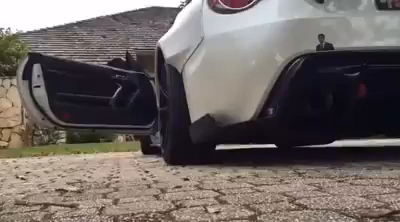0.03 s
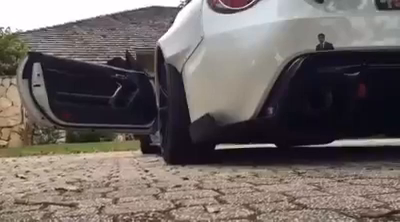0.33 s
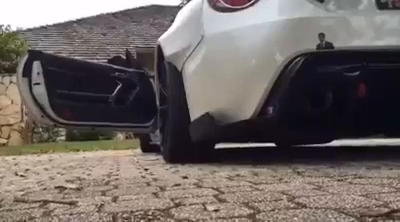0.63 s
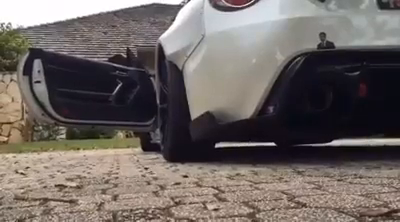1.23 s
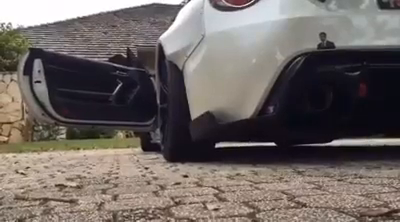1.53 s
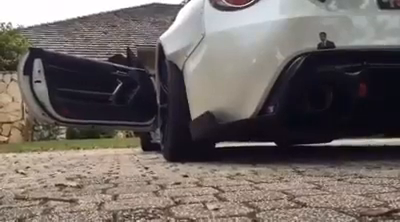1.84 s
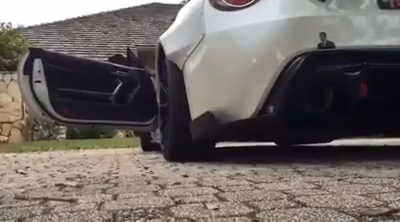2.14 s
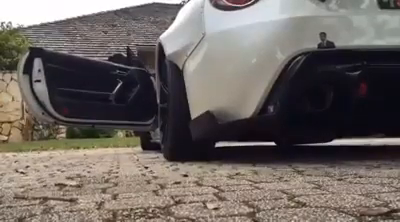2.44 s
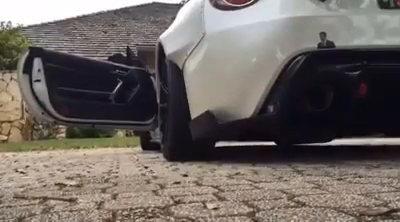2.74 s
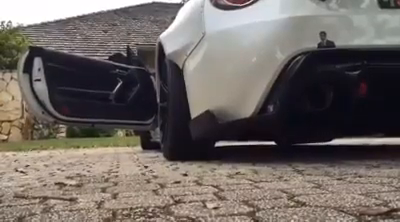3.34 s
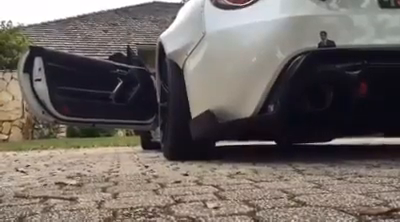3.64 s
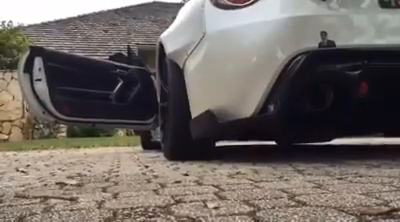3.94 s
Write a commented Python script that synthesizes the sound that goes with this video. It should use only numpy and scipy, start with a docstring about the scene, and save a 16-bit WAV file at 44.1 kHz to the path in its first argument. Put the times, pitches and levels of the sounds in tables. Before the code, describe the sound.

Heard from low behind the tailpipe, a sports car starts up: the starter hisses, the exhaust thumps hard and the revs briefly rise. It then drops to a deep, throbbing idle with a few light knocks and a short outdoor echo.

```python
"""A four-cylinder sports car starts, heard low behind its open exhaust. First the starter hisses and the
first firings bark out one by one, while gas rumbles from the pipe. Then the engine catches: gas rushes
out with each firing, and valves and the fuel pump tick in the engine bay. The revs flare and sink.
At last the engine settles into a lumpy idle in which two cylinder banks take turns, with a few light
knocks. The walls of the yard give everything a short echo."""
import sys
import numpy as np
from scipy import signal
from scipy.fft import rfft, irfft
from scipy.io import wavfile

SR = 44100
rng = np.random.default_rng(int(sys.argv[2]) if len(sys.argv) > 2 else 0)


def to_wav(s):
    """Save 16-bit WAV."""
    ch = np.atleast_2d(s).T  # columns
    pcm = np.round(np.clip(ch, -1, 1) * 32767)  # PCM
    wavfile.write(sys.argv[1], SR, pcm.astype(np.int16))


N = 176400
T = np.arange(N) / SR

# The first hard firings: start_s, thump_db, crack_db, boom_db, bark_db
FIRST_FIRINGS = [(.150, -8.5, -33, -28, -32.5), (.172, -2.5, -17.5, -3, -27.5),
                 (0.207, -10, -9.5, -2.5, -28), (.238, -0.5, -26, -6, -32), (.267, -1.5, -12, -11.5, -22.5),
                 (0.293, -5.5, -37, -28, -21.5), (0.322, -10, -14, -32, -34),
                 (.345, -17.5, -25.5, -22.5, -16.5), (.365, -6.5, -22, -28.5, -7),
                 (0.39, -13, -14, -30, -5.5), (.412, -4.5, -15, -18.5, -5.5),
                 (.433, -11, -24.5, -30.5, -20), (.454, -2, -13, -19.5, -23.5), (0.475, -4, -3, -14.5, -24),
                 (.495, -2.5, -14, -12, -16), (.515, -4.5, -8.5, -20, -21.5),
                 (.535, -14.5, -33.5, -34, -17.5), (0.611, -22, -24.5, -25, -30),
                 (0.667, -8.5, -30.5, -37, -20)]
# Tone of the crack at the mouth of the pipe: pitch_hz, gain_db
CRACK_COLOUR = [(100, -18.5), (300, 0.5), (410, 0.5), (480, -9), (600, 4.5), (760, 0), (1000, -5),
                (1600, -17.5), (2200, -31.5), (3200, -48.5), (8000, -47), (15000, -59)]
FIRST_FIRING_S = FIRST_FIRINGS[0][0]


def amp(db):
    """Turn decibels into a gain."""
    return 10 ** (np.asarray(db) / 20)


def unit(x):
    """Scale to an average (rms) level of 1."""
    return x / np.sqrt(np.mean(x ** 2) + 1e-20)


def peak(x):
    """Scale so that the highest peak is 1."""
    return x / np.abs(x).max()


def curve(rows, t=T):
    """Join (time_s, value) points with straight lines and read them at the times t."""
    return np.interp(t, *np.transpose(rows))


def gains(colour, size):
    """Turn a colour, a list of (pitch_hz, gain_db) points, into a gain for each FFT frequency."""
    hz, db = np.transpose(colour)
    return amp(np.interp(np.log(np.fft.rfftfreq(size, 1 / SR) + 1), np.log(hz + 1), db))


def noise(colour):
    """Steady noise with the given colour, at an average level of 1."""
    return unit(irfft(rfft(rng.standard_normal(N)) * gains(colour, N), N))


def pulse(colour, size=16384):
    """One pulse with the given colour that starts at once and dies away (minimum phase)."""
    cepstrum = irfft(np.log(gains(colour, size)))
    cepstrum[1:size // 2] *= 2
    cepstrum[size // 2 + 1:] = 0
    return irfft(np.exp(rfft(cepstrum)))


def ring(hz, fade_s):
    """A ringing tone that falls by 60 dB in fade_s."""
    t = T[:SR // 3]
    return np.sin(2 * np.pi * hz * t) * amp(-60 * t / fade_s)


def play(times, sizes, sound):
    """Play a copy of the sound at each time, each with its own size."""
    hits = np.bincount(np.clip(np.round(times * SR).astype(int), 0, N), sizes, N + 1)[:N]
    return signal.fftconvolve(hits, sound)[:N]


def beats(per_firing=1, lead=0, catch_s=.536):
    """Times of something driven by the crankshaft once the engine catches, lead firings early."""
    # Engine speed: time_s, firings_per_s
    speed = [(0.536, 48.53), (0.6, 54.17), (0.7, 49.19), (0.8, 49.23), (0.95, 46.63), (1.15, 44.21),
             (1.35, 41.34), (1.6, 38.94), (1.9, 38.6), (2.25, 39.56), (2.6, 39.43), (2.95, 39.6),
             (3.2, 39.92), (3.6, 39.73), (4, 39.97)]
    count = np.cumsum(curve(speed) * (T >= catch_s)) / SR
    events = np.arange(1, int((count[-1] + lead) * per_firing) + 1)
    return np.interp(events / per_firing - lead, count, T)


def jitter(times, spread_s):
    """Make each time a little early or late at random."""
    return times + rng.normal(0, spread_s, len(times))


def scatter(times, spread_db):
    """A random gain for each time."""
    return amp(spread_db * rng.standard_normal(len(times)))


def through_pipe(x, turn_hz=270):
    """The pipe delays the bass against the treble, which rounds each pulse."""
    k = np.tan(np.pi * turn_hz / SR)
    a = (k - 1) / (k + 1)
    return signal.lfilter([a, 1], [1, a], x)


def starter(whine_hz=5850, fall_hz_per_s=5900, whine_at_s=.695, width_s=.065, squeal_hz=8900):
    """A grinding hiss, then a thin whine that falls as the motor spins down, with a brief high squeal."""
    # Loudness of the starter and the first blast of air: time_s, level_db
    hiss_level = [(.148, -100), (.151, -31.5), (.165, -38.5), (.27, -37.5), (.30, -47.5), (.36, -50.5),
                  (.41, -51), (.5, -53.5), (.56, -60), (.66, -66), (.675, -52.5), (.72, -64.5), (.8, -61),
                  (1, -110)]
    # Tone of that hiss: pitch_hz, gain_db
    hiss_colour = [(300, 2), (1200, 8.5), (1800, 4), (2250, 9), (2800, -2.5), (4000, -1), (5200, 1),
                   (7000, -6), (9000, -10), (10300, -16), (11500, -14), (15000, -16.5)]
    hiss = amp(curve(hiss_level)) * noise(hiss_colour)
    waver_hz = 150 * noise([(100, -1.5), (300, 5), (900, -40)])
    falling_hz = np.clip(whine_hz - fall_hz_per_s * (T - whine_at_s), 0, SR / 2)
    whine = amp(-64.5) * np.sin(2 * np.pi * np.cumsum(falling_hz + waver_hz) / SR)
    squeal = amp(-70) * np.sin(2 * np.pi * np.cumsum(squeal_hz + waver_hz) / SR)
    swell = np.exp(-((T - whine_at_s) / width_s) ** 2)
    return hiss + swell * whine + swell ** 4 * squeal


def first_firings(tailpipe_from_s=.4):
    """Each hard firing thumps the pipe, sets its boom and bark ringing and cracks at its mouth."""
    start_s, thump_db, crack_db, boom_db, bark_db = np.transpose(FIRST_FIRINGS)
    # Tone of a thump: pitch_hz, gain_db
    thump_colour = [(20, -16.5), (45, -15), (65, -12.5), (88, 7.5), (125, -1), (160, 1), (215, 5),
                    (260, -16.5), (300, -1.5), (360, -20.5), (450, -19), (700, -42.5), (2000, -76)]
    thumps = play(start_s + .00099, amp(thump_db), peak(pulse(thump_colour)))
    booms = play(start_s + .0011, amp(boom_db), ring(hz=94.5, fade_s=.16))
    barks = play(start_s + .0015, amp(bark_db), ring(hz=253, fade_s=.058))
    cracks = play(start_s + .0012, amp(crack_db), peak(pulse(CRACK_COLOUR)))
    # The later cracks also make the tailpipe ring.
    tailpipe_sizes = amp(crack_db - 10.5) * (start_s > tailpipe_from_s)
    tailpipe = play(start_s + .0015, tailpipe_sizes, ring(hz=614, fade_s=.031))
    return through_pipe(thumps + booms + barks) - tailpipe - cracks


def gas(rise_s=.00033, decay_s=.01, steady=.26):
    """Swirling gas rushes out over a low rumble, with a puff for each firing once the engine runs."""
    # Loudness of the rush: time_s, relative_db
    rush_level = [(.3, -47), (.5, -22), (.57, -42.5), (.65, -52), (.7, -32.5), (.77, -48), (.9, -54),
                  (1.2, -58.5), (1.7, -54.5), (2.3, -48.5), (4, -48.5)]
    # Tone of the rush: pitch_hz, gain_db
    rush_colour = [(300, -12.5), (450, 3.5), (530, -7), (620, 6), (760, -4.5), (1030, -2.5), (1300, -19.5),
                   (2000, -25), (3500, -52), (9000, -82.5)]
    # Tone of the rumble: pitch_hz, gain_db
    rumble_colour = [(15, -17.5), (33, -4), (45, -5.5), (60, -10), (150, -5), (300, -10), (500, -26),
                     (1200, -67), (6000, -100)]
    times, t = beats(), T[:SR // 4]
    puff = np.exp(-t / decay_s) * (1 - np.exp(-t / rise_s))
    puffs = play(times, scatter(times, spread_db=4), puff)
    rush = amp(curve(rush_level) - 1) * unit((puffs + steady) * noise(rush_colour))
    rumble = amp(-34) * noise(rumble_colour)
    return (rush + rumble) * (T > FIRST_FIRING_S)


def engine_bay(clatter_depth=.57, clatter_decay_s=.012, tick_rise_s=.0017):
    """The valves clatter and the fuel pump gives a ringing tick, both in step with the crankshaft."""
    # Loudness of the engine bay: time_s, relative_db
    bay_level = [(.1, -110), (.15, -64), (.6, -70.5), (1, -66.5), (1.2, -64.5), (1.5, -61), (2.3, -60),
                 (4, -60.5)]
    # Tone of the clatter: pitch_hz, gain_db
    clatter_colour = [(500, -5), (1200, 2.5), (2000, 5), (2800, -2), (3300, 1), (4200, -2), (4800, 0),
                      (5600, -7.5), (7000, -12.5), (8500, -15.5), (9600, -21), (10500, -37), (15000, -53.5)]
    t, level_db = T[:SR // 8], curve(bay_level)
    valve_times = jitter(beats(per_firing=2.2), spread_s=.0012)
    taps = play(valve_times, scatter(valve_times, spread_db=3.5), np.exp(-t / clatter_decay_s))
    flutter = (T > FIRST_FIRING_S) + clatter_depth * taps
    clatter = amp(level_db + 3) * unit(flutter * noise(clatter_colour))
    pump_times = jitter(beats(per_firing=.75, lead=-.3), spread_s=.003)
    tick = ring(hz=4750, fade_s=.048) + amp(-5.5) * ring(hz=3150, fade_s=.048)
    tick = tick[:len(t)] * (1 - np.exp(-t / tick_rise_s))
    ticks = play(pump_times, np.ones(len(pump_times)), tick)
    return clatter + amp(level_db - level_db[-1] - 52) * ticks


def flare(limp_lag_s=.0022):
    """The hard-working engine sends out sharp-edged pulses, which begin to limp as the revs sink."""
    # Loudness of the pulses: time_s, level_db
    body_level = [(.54, -15), (.6, -24), (.66, -25), (.72, -17.5), (.8, -22.5), (.95, -28), (1.15, -26.5),
                  (1.3, -27.5), (1.6, -41), (2, -79)]
    # Tone of a pulse under load: pitch_hz, gain_db
    body_colour = [(20, -26), (45, -9.5), (65, -22.5), (92, 7), (125, -11), (190, 2.5), (220, -1),
                   (255, -19), (305, -8.5), (350, -24.5), (400, -19), (500, -35), (900, -47.5),
                   (2000, -78.5), (8000, -115)]
    # Loudness of its sharp edge: time_s, peak_db
    edge_level = [(.55, -26.5), (.58, -45.5), (.61, -37.5), (.64, -43.5), (.71, -31.5), (.78, -49.5),
                  (.9, -50), (1.3, -56.5), (2.2, -51.5), (4, -51.5)]
    # How much one bank outweighs the other: time_s, amount (0 to 1)
    imbalance = [(.6, .1), (.8, .15), (.95, .35), (1.3, .5)]
    times = beats()
    limp = curve(imbalance, times) * (-1) ** np.arange(len(times))  # strong and late, then weak and early
    uneven_times = jitter(times + limp_lag_s * limp, spread_s=.0003)
    sizes = (1 + limp) * scatter(times, spread_db=1.1)
    body = unit(through_pipe(play(uneven_times, sizes, pulse(body_colour))))
    edge_sizes = amp(curve(edge_level, times)) * scatter(times, spread_db=2.5)
    edge = play(times, edge_sizes, peak(pulse(CRACK_COLOUR)))
    return amp(curve(body_level)) * body - edge


def idle():
    """Round pulses from the two banks in turn; at first the pipe drones, then the banks grow unlike."""
    # Loudness of the pulses: time_s, level_db
    idle_level = [(.9, -32.5), (1.15, -35), (1.3, -32), (1.36, -21.5), (1.6, -20), (1.9, -21.5), (2.4, -18),
                  (4, -18)]
    # Tone of a pulse from bank A: pitch_hz, gain_db
    bank_a_colour = [(20, -8.5), (40, 15.5), (60, 7), (85, 30.5), (120, 35.5), (160, 40), (215, 35),
                     (250, -8), (310, -8.5), (370, 0), (450, -2.5), (800, -14), (2000, -64.5),
                     (8000, -85.5)]
    # Tone of a pulse from bank B: pitch_hz, gain_db
    bank_b_colour = [(20, -6.5), (40, 21), (60, 10.5), (85, 25.5), (120, 41), (160, 34), (215, 29),
                     (250, 13.5), (310, 25), (370, 11), (450, 1.5), (800, -12), (2000, -46.5), (8000, -82)]
    # How far bank A sounds unlike bank B: time_s, amount (0 to 1)
    contrast = [(1.3, 0.5), (1.9, 0.89), (2.3, 0.91), (3, 1)]
    # Loudness of the pipe's drone: time_s, level_db
    drone_level = [(1.25, -48), (1.38, -34), (1.6, -26), (1.9, -19.5), (2.15, -22.5), (2.4, -33), (3, -43)]
    # Tone of the drone: pitch_hz, gain_db
    drone_colour = [(30, -32.5), (80, -16), (118, 1.5), (170, -15), (400, -54.5), (2000, -110)]
    times = jitter(beats(lead=.28), spread_s=.00021)
    sizes = scatter(times, spread_db=.7)
    share_a = curve(contrast, times) * (np.arange(len(times)) % 2)  # every second pulse
    bank_a = play(times, sizes * share_a, pulse(bank_a_colour))
    bank_b = play(times, sizes * (1 - share_a), pulse(bank_b_colour))
    drone = play(times, sizes, pulse(drone_colour))
    return amp(curve(idle_level)) * unit(bank_a + bank_b) + amp(curve(drone_level)) * unit(drone)


def knocks(rise_s=.002, fade_s=.07):
    """Now and then a light knock in the exhaust, each a short burst of noise."""
    # The knocks at idle: start_s, relative_db
    hits = [(2.137, -33.5), (2.799, -39), (3.151, -32.5), (3.351, -37), (3.65, -38)]
    # Tone of a knock: pitch_hz, gain_db
    knock_colour = [(300, -25), (620, -5.5), (800, -8.5), (1050, 1), (1400, -12.5), (2200, -29),
                    (6000, -58), (12000, -89.5)]
    start_s, relative_db = np.transpose(hits)
    t = T[:SR // 4]
    burst = amp(-60 * t / fade_s) * (1 - np.exp(-t / rise_s)) ** 2
    return play(start_s, amp(relative_db), burst) * noise(knock_colour) / 2


def scene(echo_db=-22, echo_delay_s=.006, echo_fade_s=.2):
    """The car with a short echo from the walls of the yard."""
    car = first_firings() + flare() + idle() + gas() + knocks() + starter() + engine_bay()
    t = T[:SR // 2]
    tail = noise([(100, -10.5), (400, 9.5), (3000, -4.5), (12000, -13.5)])[:len(t)]
    tail *= amp(-60 * t / echo_fade_s) * (t > echo_delay_s)
    echo = signal.fftconvolve(car, tail / np.linalg.norm(tail))[:N]
    return (car + amp(echo_db) * echo)[None]


def record(dry, ceiling=.83, hardness=5, top_hz=15500):
    """The microphone rounds off the highest peaks and cuts the treble above top_hz."""
    rounded = dry / (1 + np.abs(dry / ceiling) ** hardness) ** (1 / hardness)
    return signal.sosfilt(signal.ellip(10, .1, 90, top_hz, fs=SR, output="sos"), rounded)


dry = scene()
out = record(dry)
to_wav(out)
```